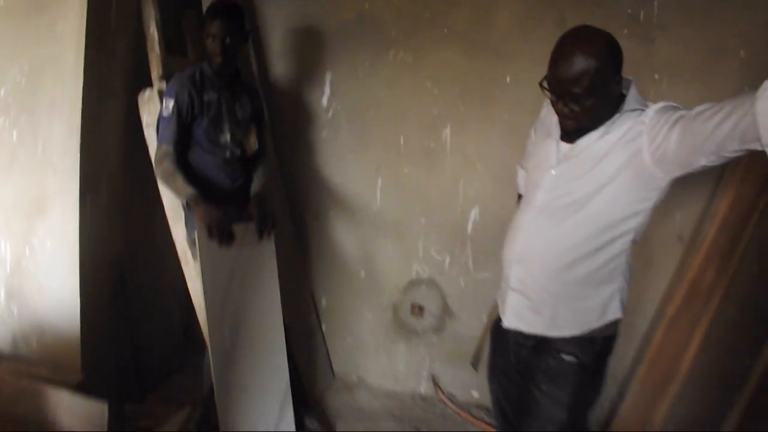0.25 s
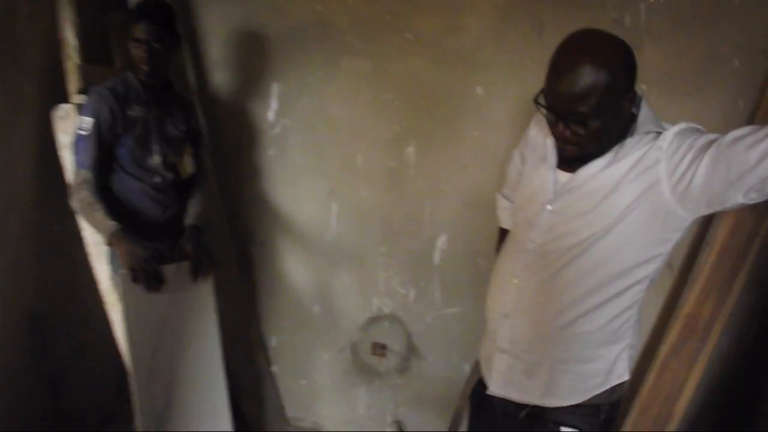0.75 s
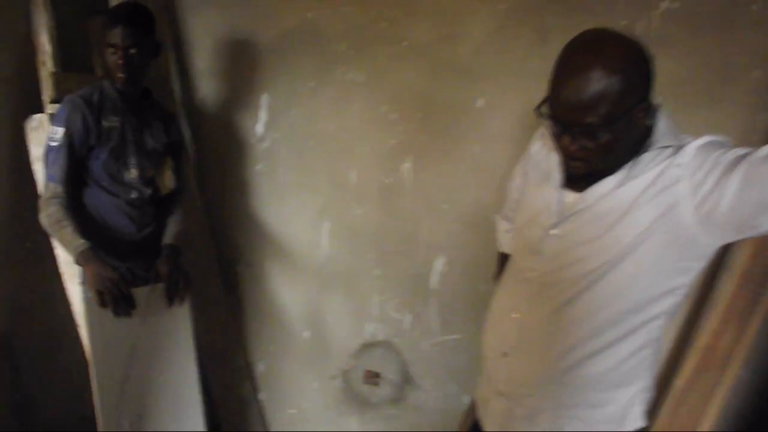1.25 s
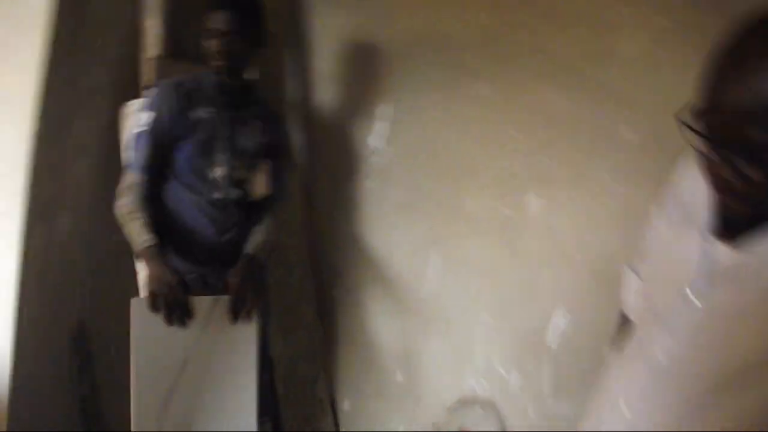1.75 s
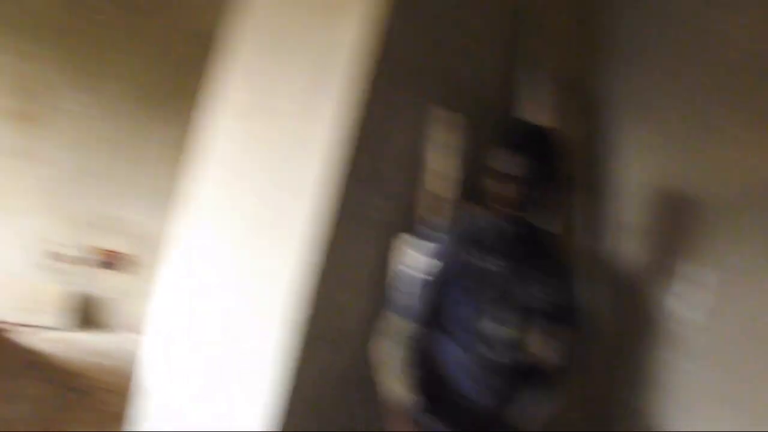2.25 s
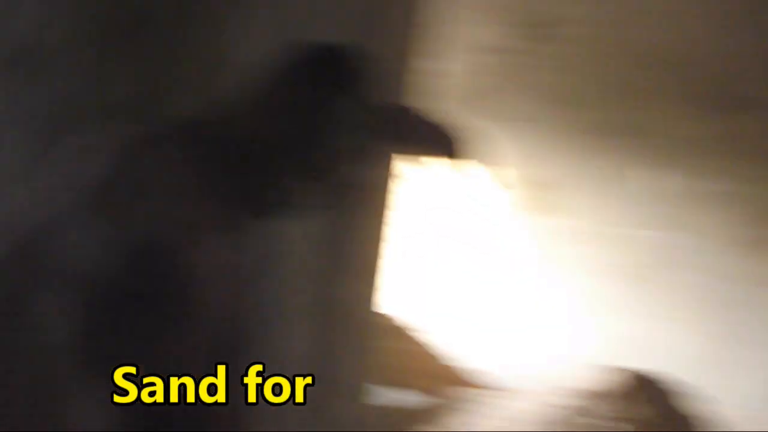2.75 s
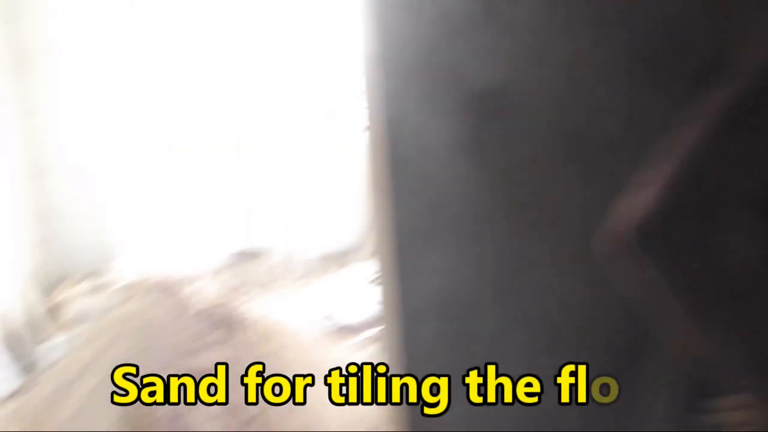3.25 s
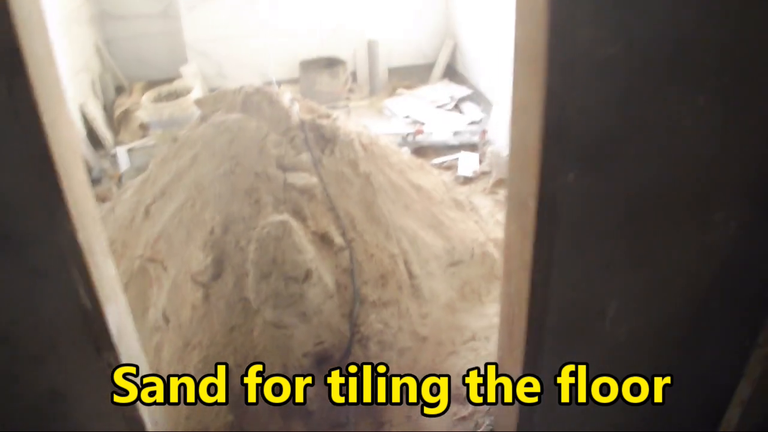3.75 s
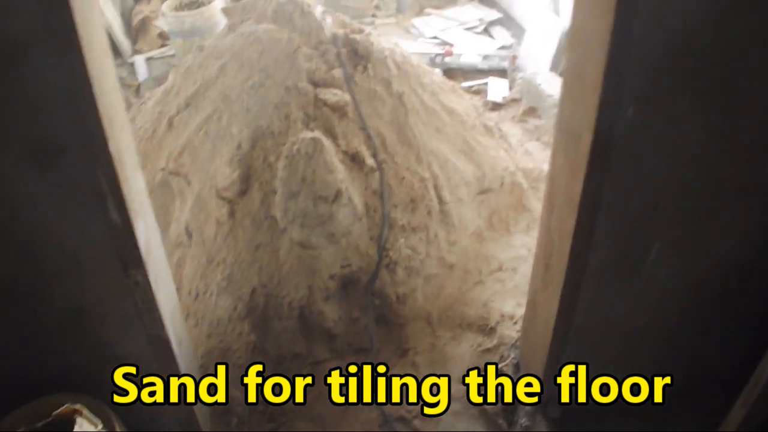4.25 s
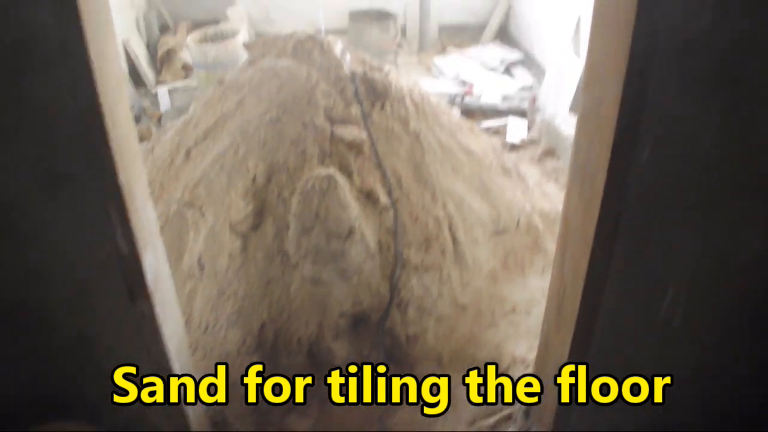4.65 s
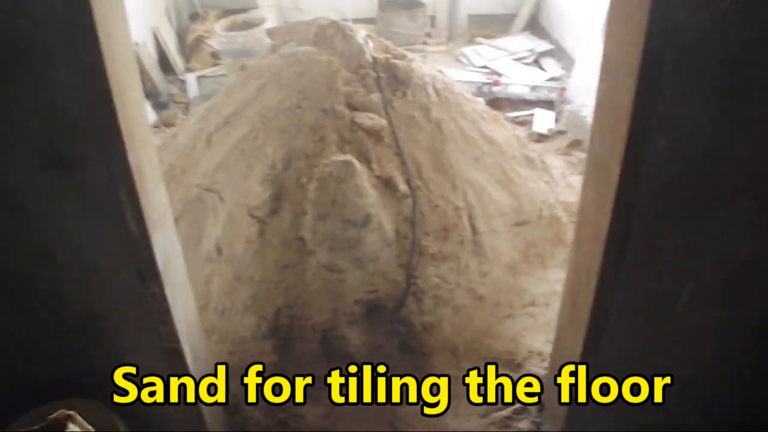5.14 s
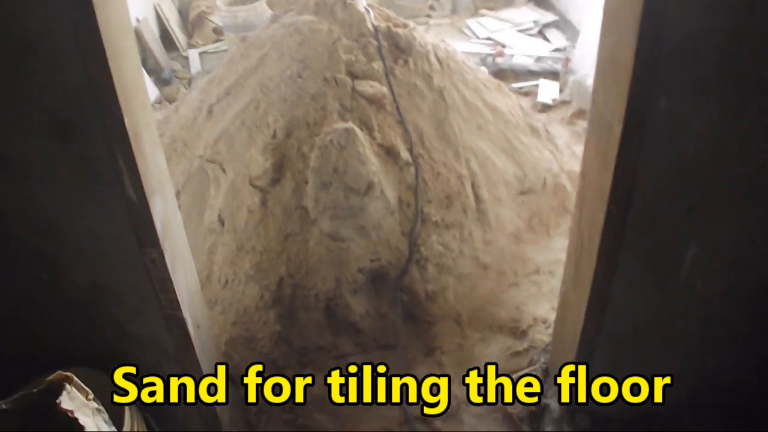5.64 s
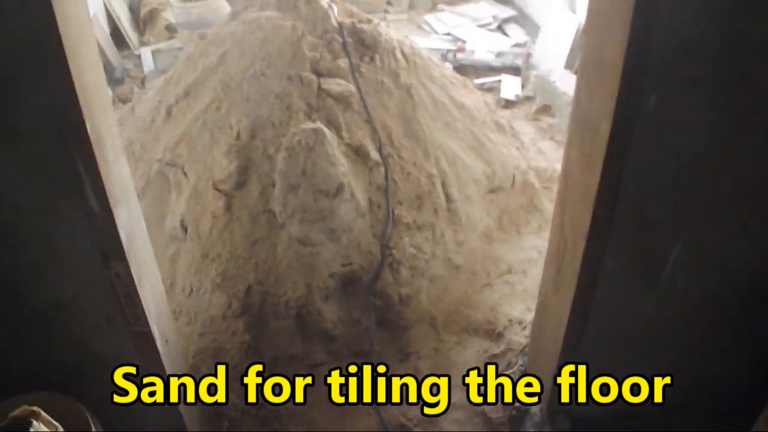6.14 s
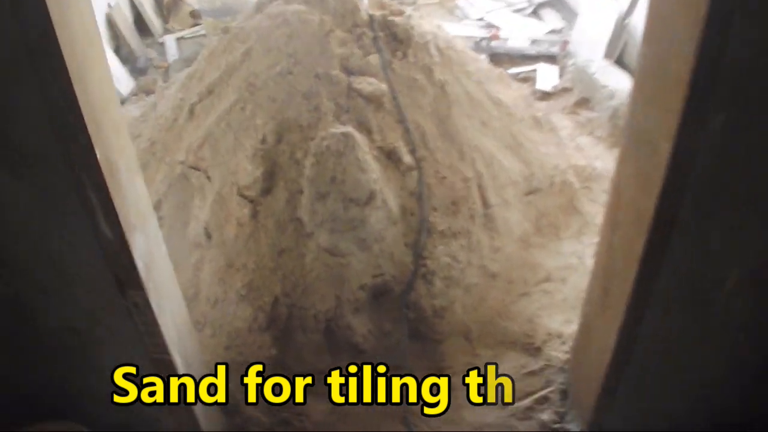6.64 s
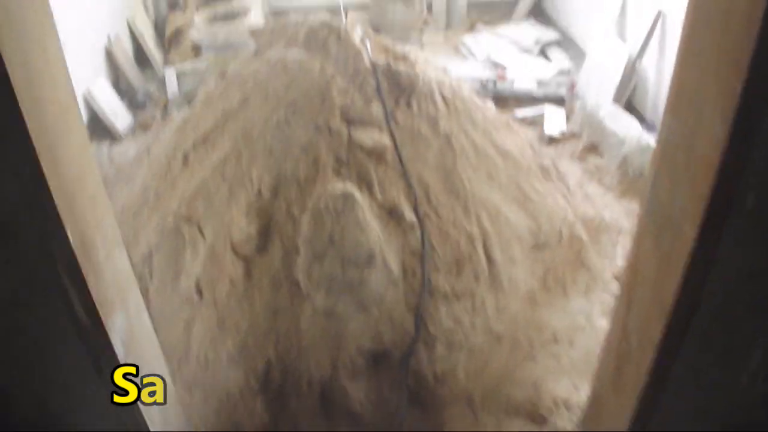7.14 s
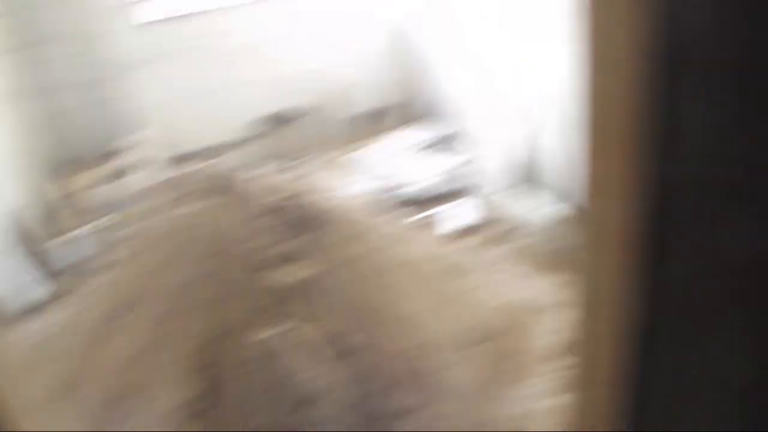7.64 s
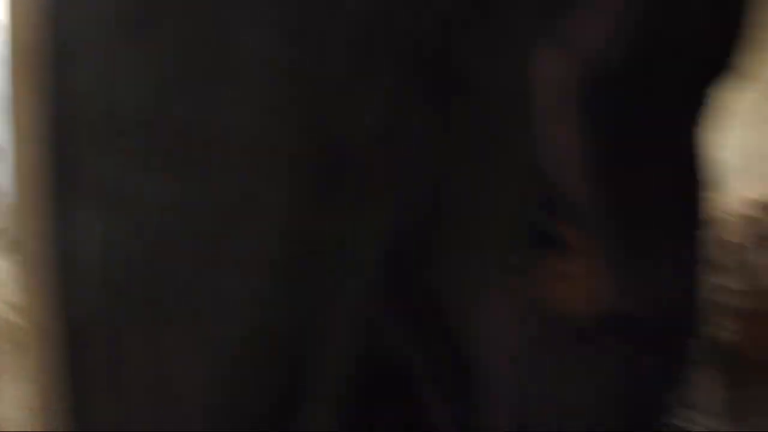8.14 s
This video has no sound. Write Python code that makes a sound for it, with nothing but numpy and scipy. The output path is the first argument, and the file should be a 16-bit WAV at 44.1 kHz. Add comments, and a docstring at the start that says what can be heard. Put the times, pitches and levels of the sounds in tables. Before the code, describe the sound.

Already running at the start and never stopping, a handheld angle grinder cuts a hard floor tile in a bare plastered room. A gritty, piercing metallic screech dominates, with a ringing tile note and motor whine below. The disc skips for split seconds, then bites again, and small flakes crack off. Short hard-wall echoes surround it; the microphone moves a few steps away.

```python
"""Angle grinder in a bare house

An angle grinder cuts a floor tile in a bare, plastered house, heard from a few steps away.
Noise for the grit, pushed once a turn and loaded until it slips, drives resonances of tile and steel disc.
The cut digs in, skips free and bites again; flakes snap off as short cracks that also strike the disc.
Sine tones at multiples of the spindle speed sag as it slows, and swell and fade as the listener walks.
Echoes and a dense noise tail make the room; filtered noise makes the rumble of the house."""
import sys
import numpy as np
from scipy import signal
from scipy.fft import rfft, irfft
from scipy.io import wavfile
from scipy.ndimage import uniform_filter1d, minimum_filter1d

SR = 44100
rng = np.random.default_rng(int(sys.argv[2]) if len(sys.argv) > 2 else 0)


def transcribe(signal):
    """Save signal, clipped to [-1, 1], as a 16-bit WAV file at the path in sys.argv[1]."""
    frames = np.atleast_2d(signal).T
    limited = np.clip(frames, -1, 1)
    pcm = np.round(limited * 32767).astype(np.int16)
    wavfile.write(sys.argv[1], SR, pcm)


N = 369999
TIME = np.arange(N) / SR
HZ = np.maximum(np.fft.rfftfreq(N + 1, 1 / SR), 1)

# Broad colour of the cutting noise. Each row: frequency in Hz, gain of the spectrum in dB.
GRIT_COLOUR = [(230, -13.5), (300, -3), (700, -16.5), (1400, -5), (2200, -2.5), (3100, -7.5), (4400, 0),
               (5200, -9), (6400, -18), (7800, -26), (8200, -24), (10000, -24.5), (11200, -39),
               (15500, -40)]
# Resonances of the steel disc. Each row: frequency in Hz, width in Hz, gain in dB before the broad colour.
DISC_RESONANCES = [(2700.9, 20.0, 13.9), (2842, 32, 18.0), (3135, 90, 22.7), (3328, 44, 18.2),
                   (3665.4, 23.6, 10.4), (3770.0, 106.3, 9.2), (4167.8, 141.9, 5.6), (4368, 66, 9.2),
                   (4944, 40, 14.2), (5484, 62, 12.4), (5750, 37, 13.5), (6560.9, 48.1, 17.3),
                   (6686.2, 42.1, 16.1), (7769, 30, 16.5), (7906, 28, 14.0), (10466.9, 87.1, 11.4),
                   (12166.4, 66.0, 12.4), (13784.0, 256.8, 6.0)]
# The disc skips free of the cut. Each row: start in seconds, drop in level in dB, seconds until it bites again.
DISC_SKIPS = [(.16, 2.5, .11), (.74, 2, .08), (.94, 1, .03), (1.12, 1, .04), (1.415, 1, .1),
              (1.557, 2, .05), (1.774, 1, .06), (2.16, 1.5, .04), (2.29, 3, .08), (2.51, 2, .04),
              (2.96, 1.5, .07), (3.1, 2.5, .08), (3.28, 1.5, .04), (4.05, 2, .07), (4.3, 1, .08),
              (4.817, 2.5, .05), (5.51, 2.5, .11), (6.06, 1.5, .05), (6.58, 2, .05), (6.74, 1, .06),
              (6.935, 1.5, .08), (7.62, 2, .05)]

STANDING_WAVE_DB, STANDING_WAVE_HZ = 3.5, 1.07  # spread and rate of the tones' swell and fade


def from_db(db):
    """Decibels to gain."""
    return 10 ** (np.asarray(db) / 20)


def rms_one(x):
    """Scale to unit power."""
    return x / np.sqrt(np.mean(x ** 2) + 1e-20)


def in_time(rows):
    """Interpolate each column of a time curve to every sample."""
    seconds, *columns = np.transpose(rows)
    return [np.interp(TIME, seconds, column) for column in columns]


def drift(rate_hz):
    """Slow random curve of unit power: noise through two equal low-pass poles at rate_hz."""
    step = 40  # samples between the computed points
    pole = np.exp(-2 * np.pi * rate_hz * step / SR)
    noise = rng.standard_normal(N // step + 2002)
    slow = signal.lfilter([1], [1, -2 * pole, pole * pole], noise)[2000:]  # skip the filter's start
    return np.interp(np.arange(N) / step, np.arange(len(slow)), rms_one(slow))


def coloured(x, spectrum):
    """Shape x with a broad spectrum, interpolated in dB over log frequency."""
    hz, db = np.transpose(spectrum)
    gain = from_db(np.interp(np.log(HZ), np.log(hz), db))
    return irfft(rfft(x, N + 1) * gain)[:N]


def above(x, edge_hz):
    """The part of x above a steep edge."""
    return irfft(rfft(x, N + 1) / (1 + (edge_hz / HZ) ** 16))[:N]


def resonate(x, hz, width_hz):
    """One resonance with a peak gain of about 1: a pole pair whose radius sets the width."""
    r = np.exp(-np.pi * width_hz / SR)
    zeros = np.array([1, 0, -1]) * (1 - r * r) / 2
    poles = [1, -2 * r * np.cos(2 * np.pi * hz / SR), r * r]
    return signal.lfilter(zeros, poles, x + 1e-18)


def evened(x, window_s):
    """Hold the power of x close to one over a short window."""
    return x / np.sqrt(uniform_filter1d(x * x, int(window_s * SR)) + 1e-12)


def during(start, end, edge_s):
    """One between two times, zero outside, with sloping edges."""
    return np.clip(.5 + np.minimum(TIME - start, end - TIME) / edge_s, 0, 1)


def swelling(level, swells):
    """A gain that moves to each swell's level, holds it and returns."""
    for start, end, db in swells:
        level = level + during(start, end, edge_s=0.23) * (from_db(db) - level)
    return level


def house_rumble():
    """Low rumble of the house: noise with a falling spectrum."""
    # Each row: frequency in Hz, gain of the spectrum in dB.
    rumble_colour = [(12, -4.5), (25, -7.5), (40, -14.5), (80, -16), (160, -16), (240, -16), (400, -34)]
    return from_db(-48.5) * rms_one(coloured(rng.standard_normal(N), rumble_colour))


def spindle_turns():
    """Turns of the spindle so far: the running sum of its speed."""
    # Each row: time in seconds, spindle speed in turns per second.
    speed_curve = [(0.0, 136.2), (0.5, 137.2), (1.4, 137.4), (1.85, 137.8), (3.0, 135.7), (3.8, 135.05),
                   (4.65, 135.8), (5.0, 135.05), (5.7, 134.5), (6.3, 135.1), (6.65, 133.8), (6.9, 134.5),
                   (7.5, 134.45), (7.7, 133.55), (8.39, 133.45)]
    return np.cumsum(in_time(speed_curve)[0]) / SR


def tone(turns, order, flutter, flutter_hz):
    """One multiple of the spindle speed; uneven contact makes its strength and phase flutter."""
    phase = 2 * np.pi * (order * turns + rng.random())
    in_phase = (1 + flutter * drift(flutter_hz)) * np.cos(phase)
    sideways = flutter * drift(flutter_hz) * np.sin(phase)
    return rms_one(in_phase + sideways)


def spindle(turns, bite_db):
    """The rim knocks once a turn: a row of tones, the high ones rougher and tied to the bite."""
    # Steady tones. Each row: multiple of the spindle speed, level in dB.
    steady_tones = [(1, -63), (2, -58), (3, -54), (4, -52), (5, -53), (6, -43), (7, -47), (8, -46),
                    (9, -44), (10, -42), (11, -41), (12, -47), (13, -43), (14, -45), (15, -39), (16, -38),
                    (17, -36), (18, -34), (19, -39), (20, -36), (21, -35), (22, -35), (23, -30), (24, -36)]
    # Tones that stand out as a whistle. Each row: start and end in seconds, multiple of the speed, level in dB.
    whistles = [(4.4, 8.6, 1, -54), (.3, 1.5, 2, -52), (5.4, 7.5, 2, -51), (.3, 3.5, 3, -42.5),
                (2.45, 3.1, 5, -39), (-.1, 1.4, 6, -40), (6.0, 8.0, 6, -36), (1.7, 2.2, 7, -36),
                (2.5, 3.2, 7, -39), (6.4, 6.9, 8, -35), (7.95, 8.6, 8, -37), (6.1, 7.5, 9, -36),
                (4.3, 6.0, 11, -36), (6.0, 7.7, 12, -35), (3.3, 3.9, 13, -32.5), (6.8, 7.6, 13, -35),
                (6.4, 7.9, 17, -30), (4.6, 5.1, 18, -26), (6.3, 7.8, 18, -23), (3.0, 6.0, 20, -30),
                (4.9, 6.1, 21, -28), (4.5, 5.6, 23, -25), (6.1, 6.5, 23, -24.5)]
    out = np.zeros(N)
    press_db = bite_db - bite_db.mean()
    for order, db in steady_tones:
        height = order / len(steady_tones)
        standing_wave = rms_one(from_db(STANDING_WAVE_DB * drift(STANDING_WAVE_HZ)))
        swells = [(start, end, swell_db) for start, end, multiple, swell_db in whistles
                  if round(multiple) == order]
        level = swelling(from_db(db) * standing_wave, swells)
        sound = tone(turns, order, flutter=0.31 + 0.07 * height ** 2, flutter_hz=5.6)
        out += level * from_db(height * press_db) * sound
    return out


def chips(crack_s, small_per_s, small_db):
    """A flake snaps off: a short crack that also strikes the disc. Smaller flakes fly at random."""
    # Each row: time in seconds, strength in dB relative to the other chips.
    big_chips = [(0.9376, 2.5), (1.4021, 2.5), (1.5532, -1), (1.7703, 11), (4.2415, -8), (4.9856, 4),
                 (6.8008, 3)]
    cracks, t = np.zeros(N), TIME[:SR // 50]
    draws = rng.random((int(small_per_s * TIME[-1]), 2))
    small_chips = [(when * (TIME[-1] - 2 * t[-1]), small_db - 6 * weakness) for when, weakness in draws]
    for s, db in list(big_chips) + small_chips:
        crack = rng.standard_normal(len(t)) * np.exp(-t / crack_s)
        at = round(s * SR)
        cracks[at:at + len(t)] += from_db(db) * crack / np.linalg.norm(crack)
    struck_disc = sum(0.6 * from_db(db) * resonate(cracks, hz, width_hz)
                      for hz, width_hz, db in DISC_RESONANCES)
    out = coloured(cracks + struck_disc, GRIT_COLOUR)
    return from_db(0.5) * out / np.abs(out).max()  # the loudest peak, ahead of the limiter


def bite():
    """Grinding level in dB: the disc digs in ever harder, skips free, then settles back into the cut."""
    edge_s, dig_s = 0.03, 0.048  # slope of a skip, time constant of the dig before it
    out = np.full(N, -15.0)  # steady grinding
    for s, drop_db, free_s in DISC_SKIPS:
        dig = np.exp(-np.abs(TIME - s) / dig_s) * np.clip((s - TIME) / edge_s, 0, 1)
        out += drop_db * (0.72 * dig - during(s, s + free_s, edge_s))
    return out


def contact(turns, runout, slip_db, slips_per_s, grains_per_s, grain_db):
    """Force of the grit: grains of uneven size, a push once a turn, and a load that builds until the rim slips."""
    grain_size = np.minimum(rng.exponential(1, N), 5)
    grains = np.sqrt(rng.poisson(grains_per_s / SR, N)) * from_db(grain_db * grain_size)
    push = np.exp(runout * np.cos(2 * np.pi * turns))
    slips = np.cumsum(slips_per_s * np.exp(.5 * drift(15.0))) / SR
    # shift the count so that every skip starts with a slip
    skip_s = np.transpose(DISC_SKIPS)[0]
    at_skips = np.interp(skip_s, TIME, slips)
    load = (slips + np.interp(TIME, skip_s, np.round(at_skips) - at_skips)) % 1
    return rms_one(grains * push * from_db(slip_db * load))


def scraped(force, modes, wander_db, wander_hz, squeal):
    """Grains strike each mode with their own strengths; friction sustains a share of the ring as a squeal."""
    out = np.zeros(N)
    for hz, width_hz, db in modes:
        ring = resonate(force * rng.standard_normal(N), hz, width_hz)
        sustained = ring.std() * evened(ring, 0.03)
        ring = ring + squeal * (sustained - ring)
        wander = rms_one(from_db(wander_db * drift(wander_hz)))  # the contact point moves
        out += from_db(db) * ring * wander
    return out


def room(x, echo, walk_s, wet_db):
    """Bare walls: early echoes whose paths shift as the listener moves, then a dense tail."""
    t60_s = 0.35
    out = x.copy()
    for delay_s in rng.uniform(.004, .028, size=6):
        out += echo * np.interp(TIME - delay_s - walk_s * drift(0.504), TIME, x)
    tail = rng.standard_normal(SR) * from_db(-60 * TIME[:SR] / t60_s)
    return out + from_db(wet_db) * signal.fftconvolve(x, tail / np.linalg.norm(tail))[:N]


def cutting(force):
    """Rasp of the grit and the rings it drives in tile and disc, coloured and placed in the room."""
    # Resonances of the tile. Each row: frequency in Hz, width in Hz, gain in dB before the broad colour.
    tile_resonances = [(334.7, 10.3, 8.5), (475, 39, 9), (614.5, 35, 15.5), (765, 50, 14), (980, 70, 9.5),
                       (1184, 28, 6.5), (1452, 4.7, 11), (2278, 5.8, 9.5), (2418, 9.7, 16)]
    rasp = from_db(-1.5) * force * rng.standard_normal(N)
    tile_ring = scraped(force, tile_resonances, wander_db=3.0, wander_hz=1.0, squeal=0.073)
    disc_ring = scraped(force, DISC_RESONANCES, wander_db=3.0, wander_hz=3.0, squeal=0.44)
    dry_cut = coloured(rasp + tile_ring + disc_ring, GRIT_COLOUR)
    return room(dry_cut, echo=0.21, walk_s=0.0001945, wet_db=-5.5)


def tile(lower, force, bite_db):
    """The tile rings lower: a steady bass, two registers and a main note that carry differently with movement."""
    # What reaches the listener. Each row: time in seconds, low and middle ring in dB before their trims.
    ring_levels = [(0.0, -47, -31), (1.0, -42, -34.5), (1.97, -39, -31), (2.65, -40, -35), (2.81, -32, -28),
                   (2.91, -39, -30), (5.65, -40.5, -31), (5.95, -37.5, -30), (7.42, -40, -28.5),
                   (7.81, -39, -31.5), (8.35, -30, -28.5)]
    # The strongest mode sings out. Each row: start and end in seconds, level in dB.
    singing = [(.95, 1.5, -28), (3.338, 3.854, -24.5), (5.25, 5.7, -24.5), (7.55, 7.895, -27.5)]
    low_db, middle_db = in_time(ring_levels)
    jolt_db = bite_db - uniform_filter1d(bite_db, SR // 3)  # quick changes of the bite
    low_gain = from_db(low_db - 1 + 0.82 * jolt_db)
    middle_gain = from_db(middle_db - 2.5 + 1.64 * jolt_db)
    note_gain = swelling(from_db(-37 + 2.0 * drift(STANDING_WAVE_HZ)), singing)

    over_bass, over_low, middle = (above(lower, edge_hz) for edge_hz in (290, 440, 800))
    note = resonate(force * rng.standard_normal(N), hz=2024.5, width_hz=12)
    return (from_db(-47) * evened(over_bass - over_low, 0.9)
            + low_gain * evened(over_low - middle, 0.86)
            + middle_gain * evened(middle, 0.82)
            + note_gain * evened(note, 0.14))


def disc(upper, bite_db):
    """The steel disc screeches, with a fine hiss above it; both follow the bite."""
    hiss = above(upper, 6200)
    screech = from_db(bite_db + 0.16) * evened(upper - hiss, 0.14)
    return screech + from_db(bite_db - 18.5) * evened(hiss, 0.19)


def scene():
    """Grinder, tile and room."""
    turns = spindle_turns()
    bite_db = bite()
    rumble = house_rumble()
    tones = spindle(turns, bite_db)
    flakes = chips(crack_s=0.001, small_per_s=5.5, small_db=-6.5)
    force = contact(turns, runout=0.21, slip_db=8.5, slips_per_s=16.0, grains_per_s=20000, grain_db=2.0)
    cut = cutting(force)
    upper = above(cut, 1700)
    grinding = tile(cut - upper, force, bite_db) + disc(upper, bite_db)
    return (rumble + tones + flakes + grinding)[None]


def record(dry):
    """A fast limiter holds the peaks to 0.92 of full scale; then a steep low-pass cuts the top."""
    gain = minimum_filter1d(.92 / np.maximum(np.abs(dry), .92), SR // 300)
    limited = dry * uniform_filter1d(gain, SR // 300)
    low_pass = signal.ellip(12, .1, 80, 15750, fs=SR, output="sos")  # ripple and stop band in dB, edge in Hz
    return signal.sosfilt(low_pass, limited)


dry = scene()
out = record(dry)
transcribe(out)
```